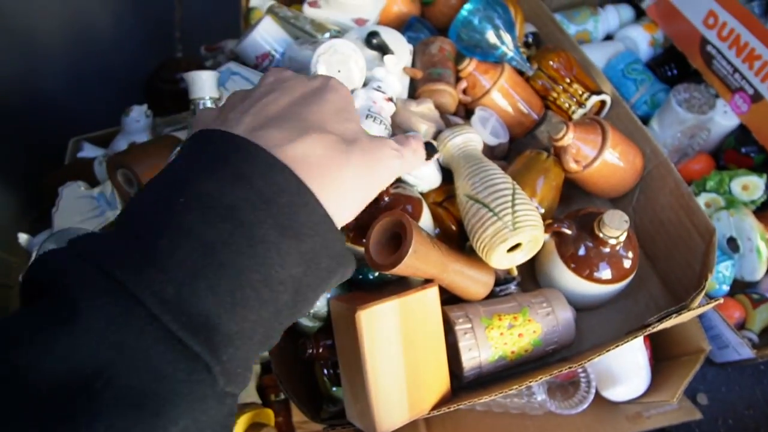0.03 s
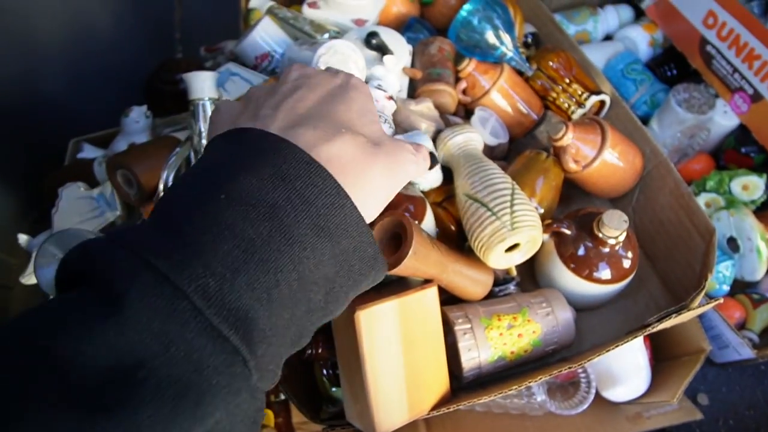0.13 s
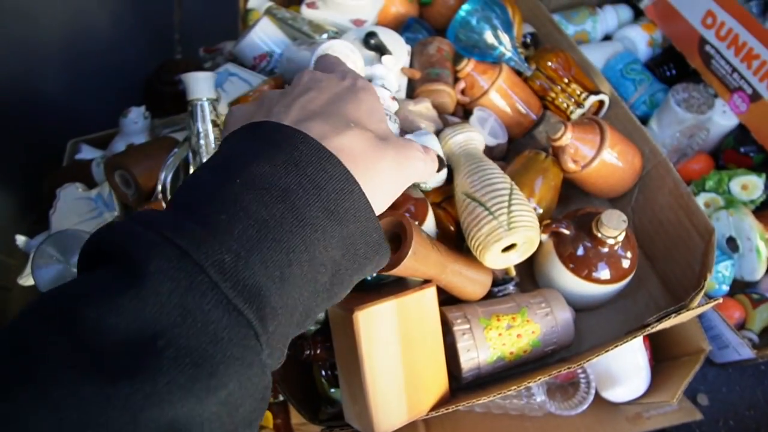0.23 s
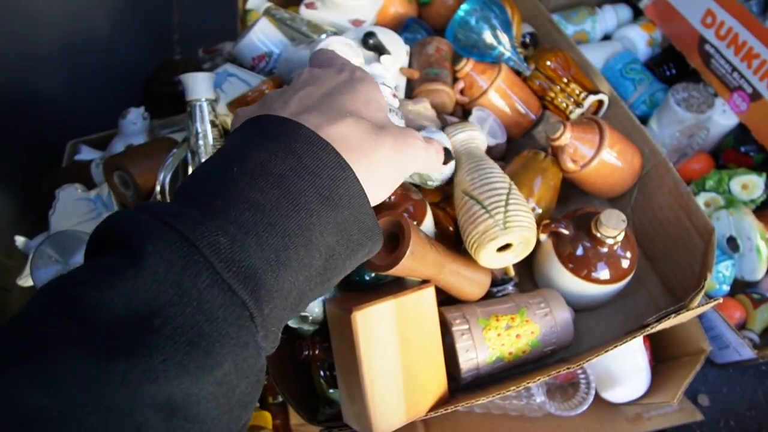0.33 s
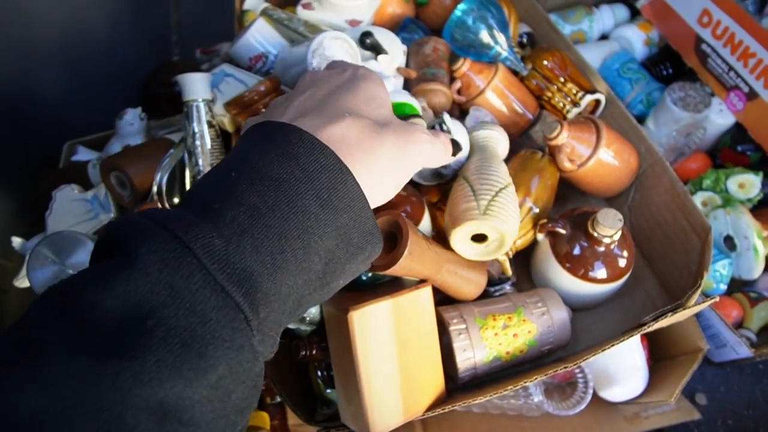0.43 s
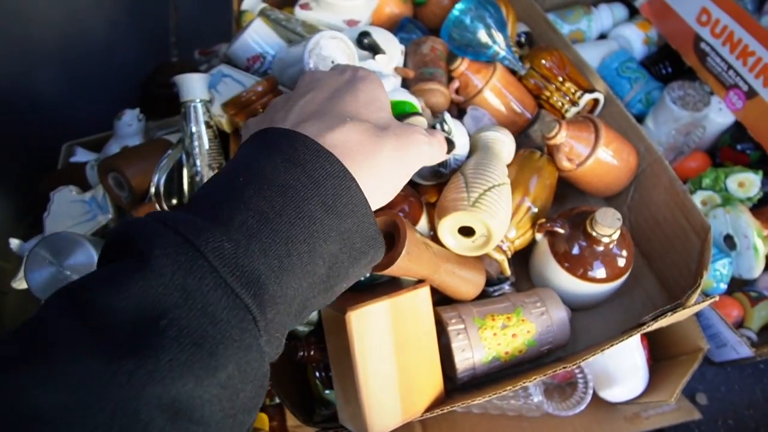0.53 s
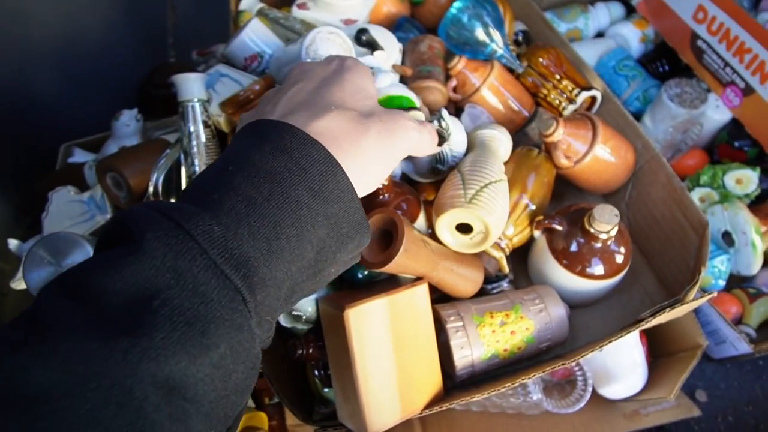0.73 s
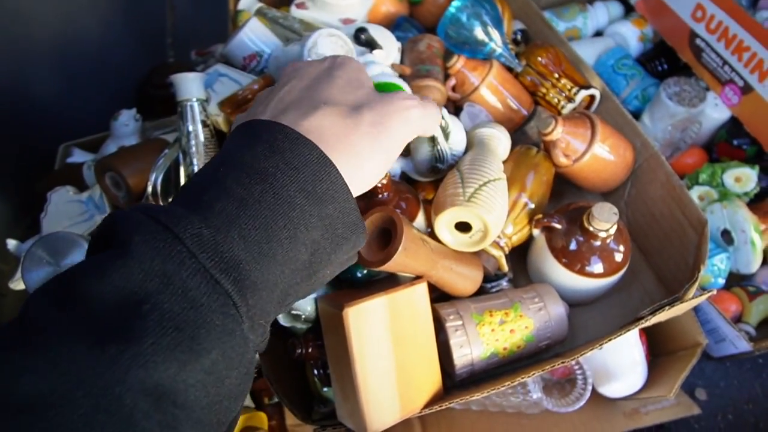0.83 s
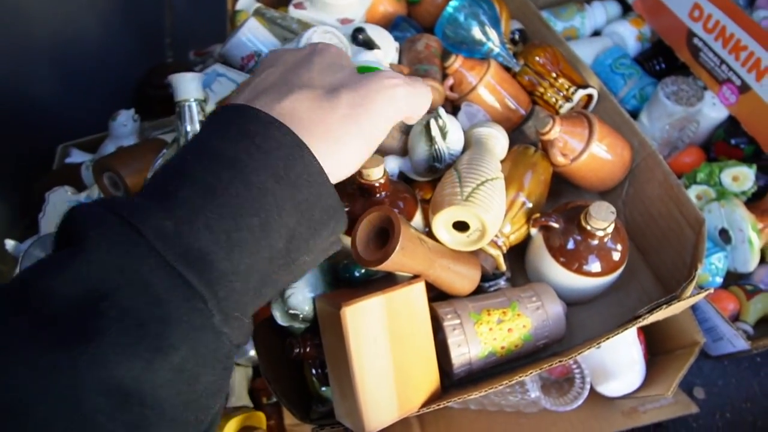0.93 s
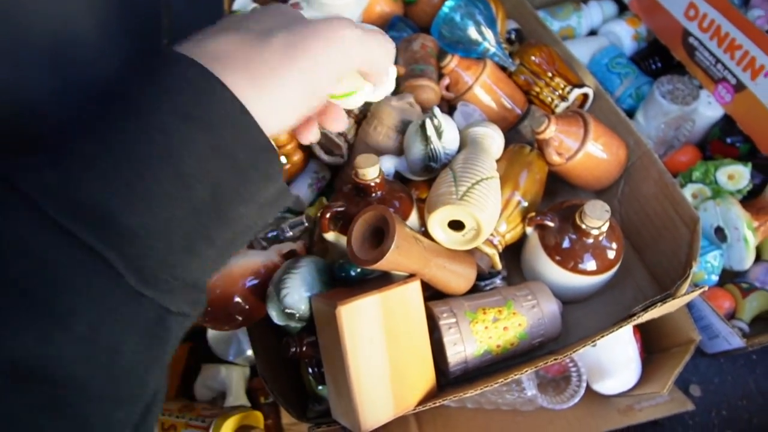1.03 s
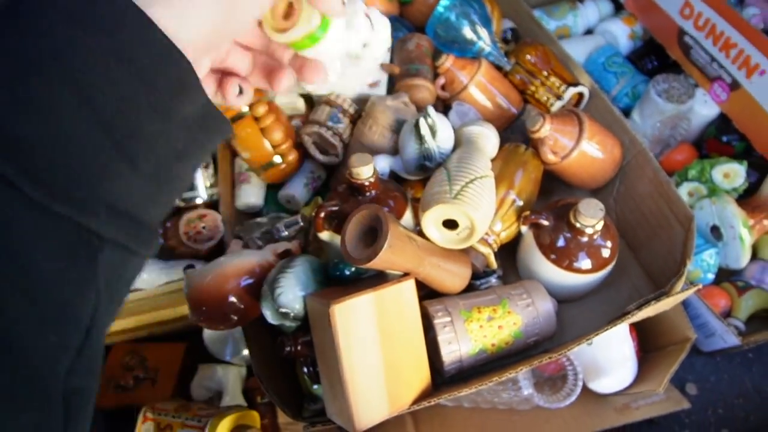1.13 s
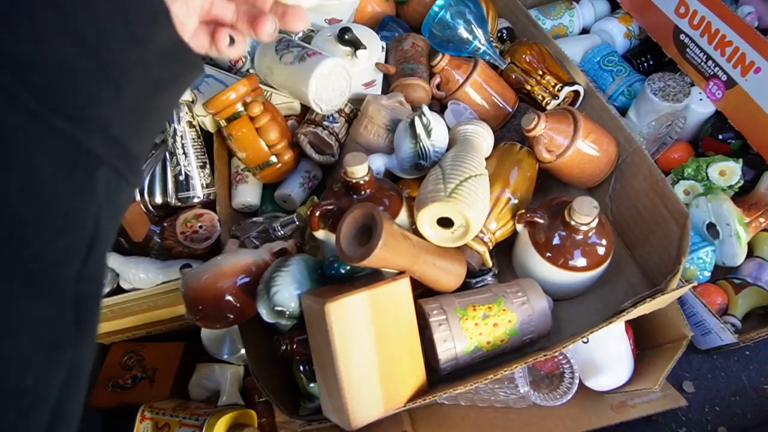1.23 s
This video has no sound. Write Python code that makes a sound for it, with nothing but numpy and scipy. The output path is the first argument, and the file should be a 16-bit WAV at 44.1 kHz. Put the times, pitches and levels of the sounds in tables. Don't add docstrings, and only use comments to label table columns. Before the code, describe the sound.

Close stereo sound of glazed pottery clinking in a packed cardboard box; a brief hush, quick knocks growing into a bright burst, then sparse settling taps, a clear jug hit and faint last ticks indoors.

```python
import sys
import numpy as np
from scipy import signal
from scipy.fft import rfft, irfft
from scipy.io import wavfile
from scipy.ndimage import uniform_filter1d

SR = 44100
rng = np.random.default_rng(int(sys.argv[2]) if len(sys.argv) > 2 else 0)


def wav_out(sig):
    wavfile.write(sys.argv[1], SR, np.round(np.clip(np.atleast_2d(sig).T, -1, 1) * 32767).astype(np.int16))


def voltage_ratio(decibels):
    exponent = np.asarray(decibels, float) / 20
    return 10 ** exponent


N = 57330
BURST = 6000
BURST_T = np.arange(BURST) / SR
EARS = np.array([[1.], [-1.]])

# frequency in Hz, level in dB.
AIR_SPECTRUM = [(25, -38), (60, -18), (140, -13.5), (400, -5.5), (900, -1), (2500, -9.5), (6000, -23),
                (16000, -26)]
AIR_DB = -55.5
HUM_HZ, HUM_WIDTH_HZ, HUM_DB = 192, 15, -69.5
WHINE_HZ, WHINE_WIDTH_HZ, WHINE_DB = 4920, 110, -73.5
# frequency in Hz, likeness from 0 to 1.
PORT_LIKENESS = [(60, 1), (950, 0.8), (15000, 0.16)]

# time in seconds, level in dB.
STIR_LEVEL = [(0, -70.5), (.15, -64.5), (.24, -48), (.35, -55), (.5, -43), (.62, -56), (.85, -63.5),
              (1.0, -55), (1.2, -64), (1.3, -54.5)]
# frequency in Hz, level in dB.
RUSTLE_SPECTRUM = [(88, -59.5), (150, -9.5), (550, 0.5), (618, 2), (695, -10.5), (1450, -5), (2100, -11),
                   (5030, -8), (15500, -33)]
GRAINS_PER_S, GRAIN_DB, RUSTLE_DB = 4200, 4.5, 4.5
# time in seconds, level in dB.
SLIDE_LEVEL = [(.95, -81.5), (1.08, -63.5), (1.14, -49.5), (1.156, -38.5), (1.18, -69.5), (1.22, -86)]
SLIDE_HZ, SLIDE_WIDTH_HZ = 6200, 2300

# start in seconds, frequency in Hz, peak in dB, t60 in seconds.
RINGS = [(0.198, 8200, -54.5, 0.24), (0.197, 5790, -48, 0.22), (0.2438, 5770, -33.5, 0.064),
         (0.244, 9260, -39, 0.053), (0.267, 8150, -38, .045), (0.263, 12060, -53, .08),
         (.415, 5850, -43, 0.18), (0.444, 8130, -35, 0.075), (0.451, 9800, -40, 0.033),
         (0.467, 8040, -32.5, 0.12), (0.465, 9930, -39.5, .12), (.472, 13800, -57.5, 0.073),
         (0.47, 5720, -28.5, 0.067), (0.476, 8850, -38.5, 0.21), (.495, 5740, -27, 0.084),
         (0.5115, 7937, -7, 0.033), (.514, 5740, -15, 0.042), (0.515, 6176, -19.5, 0.03),
         (.5103, 12230, -31.5, 0.036), (.53, 8100, -40, 0.11), (.558, 8140, -33, 0.087),
         (0.561, 5420, -20.5, 0.039), (0.559, 5694, -31, 0.058), (0.559, 5970, -26.5, 0.074),
         (0.565, 9916, -31.5, 0.065), (.562, 13540, -51, 0.066)]
# start in seconds, frequency in Hz, peak in dB, t60 in seconds.
FAINT_RINGS = [(.688, 8230, -59, 0.043), (.714, 8170, -52.5, 0.072), (0.788, 8160, -57.5, 0.04),
               (0.9, 8730, -43.5, 0.076), (0.8982, 4600, -34, 0.052), (1.15, 7150, -33.5, 0.019),
               (1.268, 8790, -59, 0.2)]
RING_SIDE_RAD, RING_LEAN_DB = .3, -2
RING_RISE_S, RING_BEND = .001, 1.217
RING_BUZZ, BUZZ_S = .27, .003

# start in seconds, peak in dB, centre in Hz, t60 in seconds.
KNOCKS = [(0.1913, -39, 2400, 0.017), (0.195, -20, 2590, 0.056), (0.2122, -26.5, 2920, .03),
          (.2205, -26, 1360, 0.12), (.227, -25.5, 678, 0.043), (.2417, -15, 1700, 0.045),
          (0.2459, -11.5, 2290, 0.028), (0.2492, -18.5, 1980, 0.062), (0.278, -29.5, 1250, 0.058),
          (0.2954, -19.5, 1840, 0.052), (.297, -26, 529, 0.023), (.386, -40, 1280, 0.043),
          (0.3987, -30.5, 740, 0.1), (0.435, -28.5, 1950, 0.12), (0.445, -6, 2300, 0.034),
          (.4485, -26, 1780, 0.026), (0.4664, -7, 2460, 0.022), (0.4738, -7, 3780, 0.025),
          (0.4776, -24.5, 1160, 0.15), (0.488, -24.5, 2000, 0.14), (0.496, -25.5, 2250, 0.032),
          (.503, -11, 2204, 0.092), (0.511, -7, 2870, 0.045), (.5155, -30, 1880, 0.023),
          (0.525, -17.5, 2500, .05), (0.5581, -2, 2575, .04), (0.5626, -13.5, 1900, .04),
          (0.5846, -12, 2560, 0.036)]
# start in seconds, peak in dB, centre in Hz, t60 in seconds.
BUMPS = [(0.6882, -30, 1510, 0.031), (.714, -28, 1580, .04), (.721, -24, 1880, 0.01),
         (0.7239, -23.5, 1540, 0.031), (0.7884, -30.5, 2100, 0.023), (0.791, -32, 1200, 0.034),
         (.887, -37, 1400, .06), (0.8991, -23, 3570, 0.059), (0.905, -37.5, 482, 0.031),
         (.9785, -13.5, 2610, 0.053), (0.9347, -34, 3000, 0.047), (1.1517, -28.5, 4200, 0.026),
         (1.2608, -32.5, 3520, 0.012), (1.2674, -28, 780, 0.048), (1.278, -38.5, 856, 0.059),
         (1.2827, -38, 3620, 0.026)]
# start in seconds, peak in dB, upper edge of the band in Hz.
TICKS = [(0.214, -33, 9000), (.2412, -30, 10000), (0.434, -35, 9000), (0.5097, -10.5, 8000),
         (0.56, -28.5, 9000), (.8990, -26.5, 8870), (1.1524, -26, 8620), (1.2657, -32.5, 11000)]
TICK_S = .0014
# frequency in Hz, level in dB.
HEAP_MODES = [(270, -3.5), (480, 1.5), (730, 1.5), (930, -1.5), (1120, -3.5), (1330, -3), (1540, -4),
              (1730, -1.5), (1960, -4.5), (2250, -5), (2600, -0.5), (3200, -4.5), (3750, -3.5),
              (4400, -8.5)]
SPREAD_OCT, DETUNE, SCATTER_DB, BASS_LINGER = 1.368, 0.0522, 2.5, 0.29
LAG_CYCLES, BLOW_CYCLES = 0.82, 2.15
BLOW_DB, CLATTER_DB, SHARD_DB, GRIT_DB = 1, -11, -24, -20
SHARD_LOW_HZ, SHARD_TOP_HZ, GRIT_HZ = 4600, 13500, 6000
# frequency in Hz, level in dB, t60 in seconds.
JUG_MODES = [(727, -23, 0.071), (1107, -11.5, 0.042), (1370, -13, 0.054), (2077, -9, 0.031),
             (2486, -4, 0.027), (4055, 0.5, 0.032), (4980, -6, 0.036), (5120, -17.5, 0.045),
             (5840, -16.5, .06)]
JUG_S, JUG_DB = 0.98, -15.5
ECHO_DB, ECHO_T60_S = -16., 0.032

LEAN_DB, LOW_CUT_HZ, MIC_TOP_HZ = -0.86, 222, 14000


def evened(x):
    return x / np.sqrt(np.mean(x ** 2) + 1e-20)


def read(points, hz):
    f, value = np.transpose(points)
    return np.interp(np.log(hz + 1), np.log(f + 1), value)


def curve(points):
    s, db = np.transpose(points)
    return voltage_ratio(np.interp(np.arange(N) / SR, s, db))


def add(mix, s, sound):
    part = mix[..., round(s * SR):][..., :sound.shape[-1]]
    part += sound[..., :part.shape[-1]]


def coloured(x, gain):
    return irfft(rfft(x) * gain(np.fft.rfftfreq(N, 1 / SR)), N)


def band(x, low_hz, high_hz):
    return signal.lfilter(*signal.butter(1, [low_hz, high_hz], "band", fs=SR), x)


def decay(t60, rise):
    return (1 - np.exp(-BURST_T / rise)) * voltage_ratio(-60 * BURST_T / t60)


def mode(hz, t60, rise, phase=0):
    return decay(t60, rise) * np.sin(2 * np.pi * hz * BURST_T + phase)


def buzz():
    width = int(BUZZ_S * SR)
    smooth = uniform_filter1d(rng.standard_normal(BURST), width)
    return evened(uniform_filter1d(smooth, width))


def fuzzy(x, hz, width_hz):
    return evened(coloured(x, lambda f: 1 / (1 + ((f - hz) / width_hz) ** 2)))


def paired(a, b):
    def same(f):
        return np.clip(read(PORT_LIKENESS, f), 0, 1)

    right = coloured(a, same) + coloured(b, lambda f: np.sqrt(1 - same(f) ** 2))
    return np.array([a, right])


def air():
    a, b, c, d = rng.standard_normal((4, N))
    tone = evened(coloured(paired(a, b), lambda f: voltage_ratio(read(AIR_SPECTRUM, f))))
    hum = fuzzy(c, HUM_HZ, HUM_WIDTH_HZ)
    whine = fuzzy(d, WHINE_HZ, WHINE_WIDTH_HZ)
    return voltage_ratio(AIR_DB) * tone + voltage_ratio(HUM_DB) * hum + voltage_ratio(WHINE_DB) * whine


def rustle():
    happens = rng.random(N) < GRAINS_PER_S / SR
    grains = voltage_ratio(GRAIN_DB * np.minimum(rng.exponential(1, N), 5)) * happens
    bed = 1.6 + evened(np.convolve(grains, np.exp(-np.arange(400) / 80))[:N])
    a, b, c, d = rng.standard_normal((4, N)) * bed
    stir = evened(coloured(paired(a, .5 * a + b), lambda f: voltage_ratio(read(RUSTLE_SPECTRUM, f))))
    slide = evened(coloured(paired(c, d), lambda f: 1 / (1 + ((f - SLIDE_HZ) / SLIDE_WIDTH_HZ) ** 2) ** 2))
    return stir * curve(STIR_LEVEL) * voltage_ratio(RUSTLE_DB) + slide * curve(SLIDE_LEVEL)


def glaze():
    out = np.zeros((2, N))
    for s, hz, db, t60 in RINGS + FAINT_RINGS:
        side = RING_SIDE_RAD * rng.choice([-1., 1.])
        level = voltage_ratio(db + RING_LEAN_DB * EARS * (hz < 7000))
        flutter = (1 + RING_BUZZ * buzz()) * voltage_ratio(-60 * (BURST_T / t60) ** RING_BEND)
        phase = side * EARS + .5 * RING_BUZZ * buzz()
        add(out, s, level * flutter * mode(hz, 9.3, RING_RISE_S, phase))
    return out


def knock(db, hz, t60):
    blow = mode(hz, 7.17 * BLOW_CYCLES / hz, 0.17 / hz)

    f, level_db = np.transpose(HEAP_MODES * 3)[:, :, None]
    a, b, c = rng.standard_normal((3, len(f), 1))
    near = np.exp(-.5 * (np.log2(f / hz) / SPREAD_OCT) ** 2)
    ring = mode(f * (1 + DETUNE * b), t60 * (2000 / f) ** BASS_LINGER, LAG_CYCLES / f, 3 * c)
    clatter = (near * voltage_ratio(level_db + SCATTER_DB * a - 5) * ring).sum(0)

    u, v = rng.random((2, 8, 1))
    shard_hz = SHARD_LOW_HZ * (SHARD_TOP_HZ / SHARD_LOW_HZ) ** u
    shards = (v * mode(shard_hz, t60 * .8, .001) * voltage_ratio(-12 * u)).sum(0)
    grit = band(rng.standard_normal(BURST), GRIT_HZ / 2, GRIT_HZ) * decay(t60 * .5, 0.00021)
    bright = (hz / 2000) * (voltage_ratio(SHARD_DB) * shards + voltage_ratio(GRIT_DB) * grit)
    return voltage_ratio(db) * (voltage_ratio(BLOW_DB) * blow + voltage_ratio(CLATTER_DB) * clatter + bright)


def jug():
    out = np.zeros(BURST)
    for hz, db, t60 in JUG_MODES:
        flutter = 1 + RING_BUZZ * buzz()
        out += voltage_ratio(JUG_DB + db) * flutter * mode(hz, t60, 0.00017, RING_BUZZ * buzz())
    return out


def tick(db, hz):
    snap = rng.standard_normal(BURST) * decay(np.log(1000) * TICK_S, 1 / SR)
    return voltage_ratio(db) * band(snap, hz * .5, hz * 0.97)


def box_echo(dry):
    signs = rng.choice([-1., 1.], (2, BURST))
    sparse = rng.random((2, BURST)) < .05
    taps = signs * sparse * decay(ECHO_T60_S, 0.0013)
    return signal.fftconvolve(dry[None], taps / np.linalg.norm(taps[0]), axes=1)[:, :N]


def pottery():
    dry = np.zeros(N)
    for s, *row in KNOCKS + BUMPS:
        add(dry, s, knock(*row))
    add(dry, JUG_S, jug())
    for s, *row in TICKS:
        add(dry, s, tick(*row))
    return dry + voltage_ratio(ECHO_DB) * box_echo(dry)


def scene():
    hits = pottery() * voltage_ratio(.5 * EARS * LEAN_DB) + glaze()
    low_cut = signal.butter(4, LOW_CUT_HZ, "high", fs=SR, output="sos")
    return signal.sosfilt(low_cut, hits + rustle()) + air()


def roll_off(x):
    return signal.sosfilt(signal.butter(12, 16360, fs=SR, output="sos"), x)


def record(dry):
    dull = signal.sosfilt(signal.butter(3, MIC_TOP_HZ, fs=SR, output="sos"), dry)
    return roll_off(dull)


dry = scene()
out = record(dry)
wav_out(out)
```